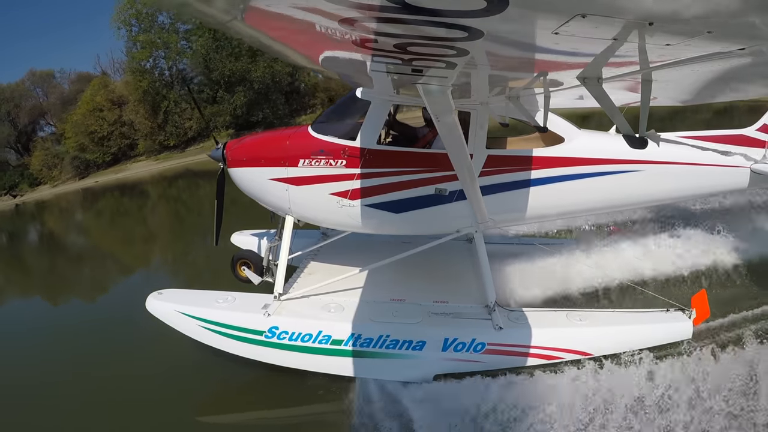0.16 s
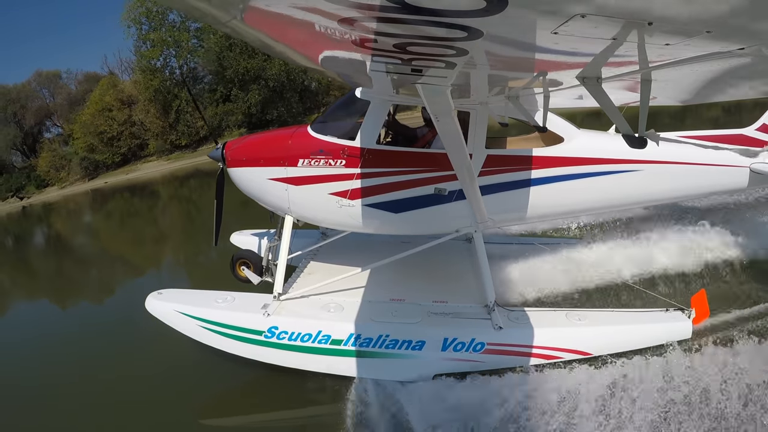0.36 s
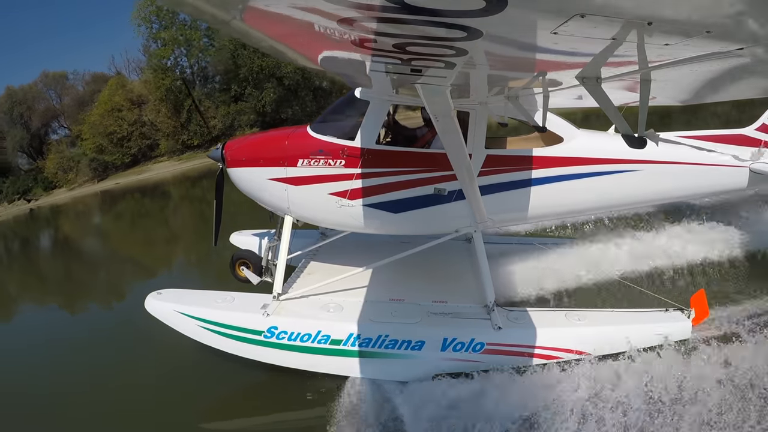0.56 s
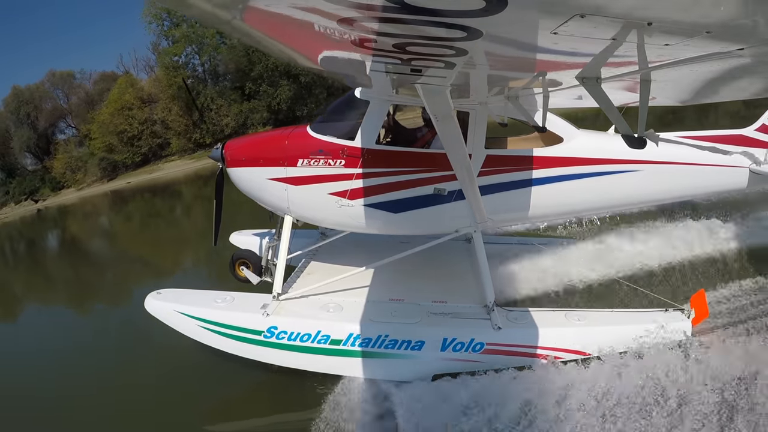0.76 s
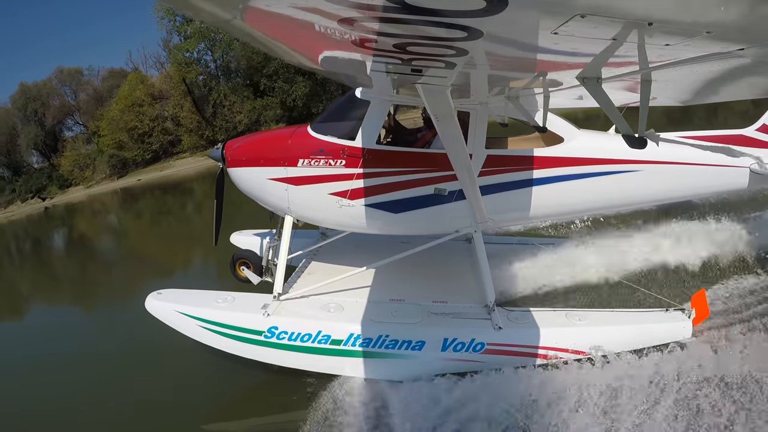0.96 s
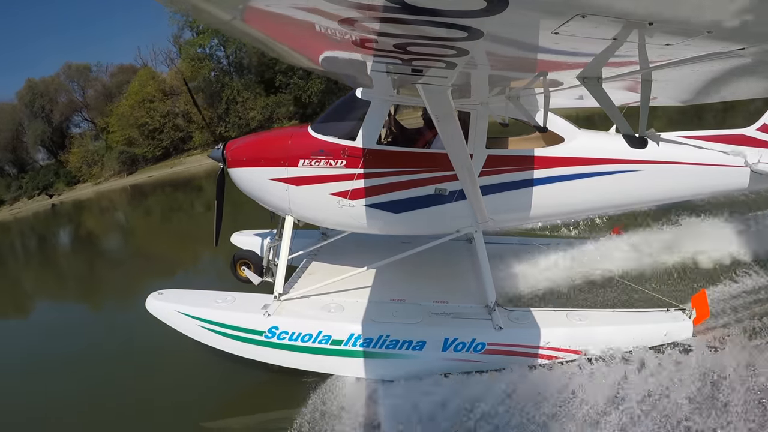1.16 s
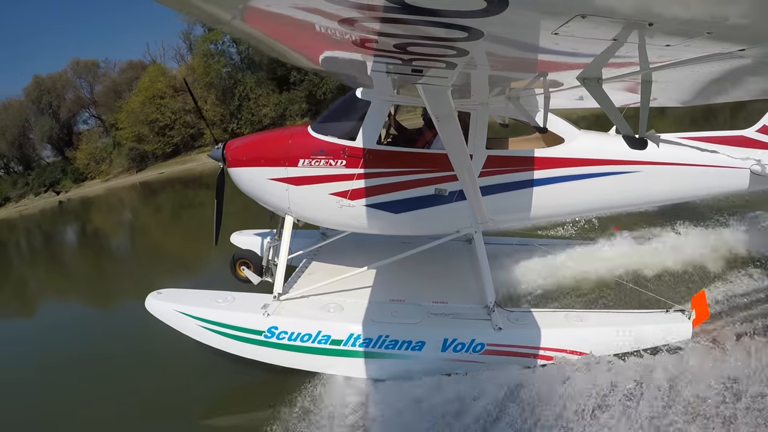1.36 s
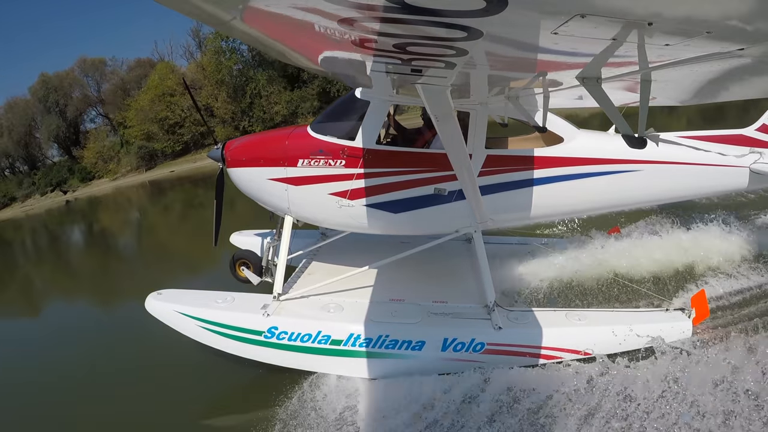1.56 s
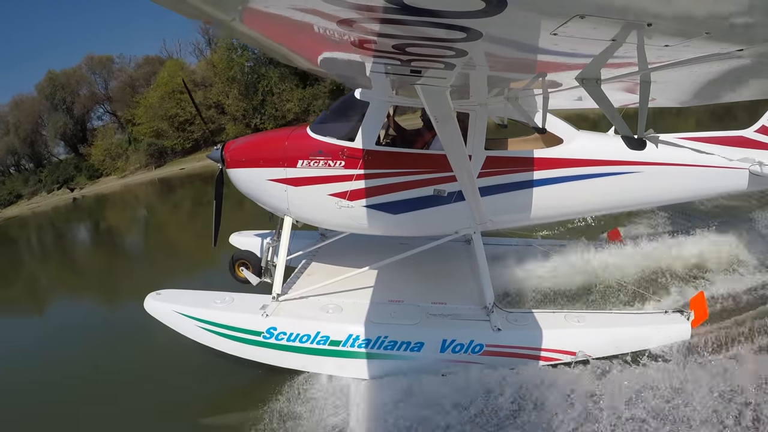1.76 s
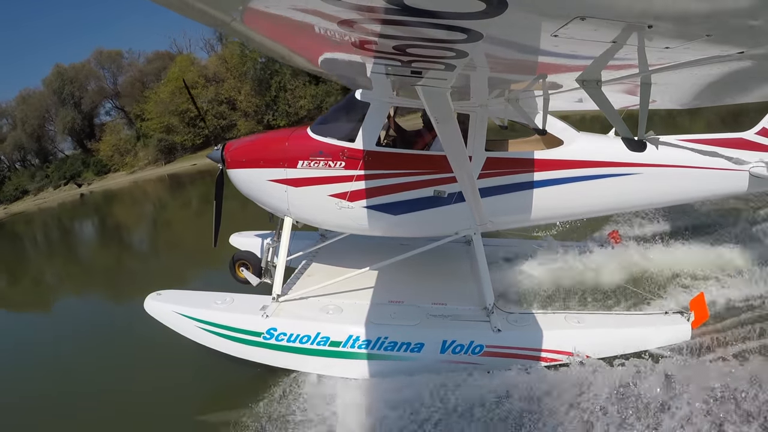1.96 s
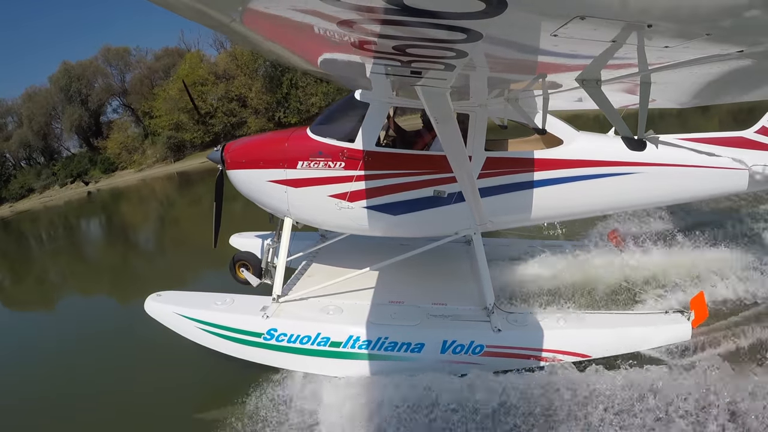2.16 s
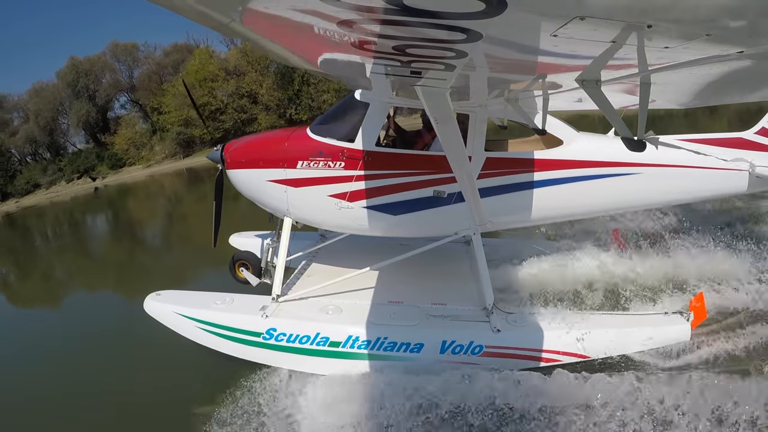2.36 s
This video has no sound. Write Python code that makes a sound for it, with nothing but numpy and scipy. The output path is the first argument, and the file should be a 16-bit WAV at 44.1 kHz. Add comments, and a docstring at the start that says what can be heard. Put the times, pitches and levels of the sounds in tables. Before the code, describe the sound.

Close, bassy wind buffeting dominates on a moving floatplane over a river, thudding in irregular swells; a soft hiss of spray runs throughout, then bubbling water splashes build during the last second.

```python
"""On a river, under the wing of a skimming floatplane: a microphone in a housing fixed in the airstream.
Up close, shaped noise and short wavering tones make the housing boom in uneven swells over a low engine drone.
The floats throw a hissing sheet of spray, random clicks and noise that brighten as it creeps forward.
A churning wash of noise and ringing bubbles builds in surges; a thin high sizzle of mist joins at the end.
"""
import sys
import numpy as np
from scipy import signal
from scipy.fft import rfft, irfft
from scipy.io import wavfile
from scipy.ndimage import uniform_filter1d, minimum_filter1d

SR = 44100
rng = np.random.default_rng(int(sys.argv[2]) if len(sys.argv) > 2 else 0)


def waveform_to_disk(signal):
    """Save audio, clipped to [-1, 1], as 16-bit WAV at the path in sys.argv[1]."""
    frames = np.transpose(np.atleast_2d(signal))
    scaled = np.clip(frames, -1, 1) * 32767
    samples = np.round(scaled).astype(np.int16)
    wavfile.write(sys.argv[1], SR, samples)


N = 111573

# rumble of the airstream on the housing: pitch_hz, relative_level_db
BUFFET_SPECTRUM = [(10, -20), (19, 1.5), (33, -17.5), (48, -3), (64, -2), (95, -0.1), (125, -6),
                   (150, -5.5), (175, -9), (215, -13.5), (260, -18.5), (310, -20.5), (400, -23.5),
                   (700, -31.5), (1200, -45), (3000, -86)]
# resonances of the housing and its mount: pitch_hz, width_hz, level_db before the swing, share of the swing
HOUSING_RESONANCES = [(72, 36, -38, 0.3), (126, 45, -38.5, 0.75), (202.3, 53, -50, 0.67)]
# swing of the boom, added to housing and engine levels: time_s, swing_db
BOOM_SWING = [(0, 8.5), (.15, -11), (.3, 2), (.55, -6.5), (.8, 7), (1.0, -6), (1.25, 1.5), (1.5, -1),
              (1.78, 6), (1.93, -19), (2.04, 3.5), (2.18, 4.5), (2.33, -7.5), (2.53, -5)]
# swells in which the housing booms: middle_s, length_s, pitch_hz, level_db
BOOM_SWELLS = [(0.017, 0.073, 50.8, -31.5), (0.065, 0.049, 115.1, -34.5), (0.17, 0.055, 74.6, -32.5),
               (0.214, 0.036, 116.2, -30), (.29, 0.08, 126, -29), (0.354, 0.059, 137, -30.5),
               (0.423, 0.029, 117.8, -27.5), (0.46, 0.073, 79.5, -33.5), (0.523, 0.024, 120, -27),
               (0.631, 0.045, 122, -32.5), (.67, 0.083, 80, -32), (0.786, 0.091, 117.4, -31),
               (0.935, 0.036, 111.6, -30.5), (1.012, 0.11, 74.8, -30), (1.202, 0.031, 130.5, -27),
               (1.309, 0.046, 120.4, -28), (1.42, 0.066, 134, -33.5), (1.433, 0.03, 76.9, -31),
               (1.607, 0.076, 129, -29.5), (1.68, 0.06, 65.3, -35), (1.785, 0.075, 120, -28.5),
               (1.856, .045, 67.5, -32), (2.008, 0.026, 129.9, -26.5), (2.06, 0.053, 72, -30.5),
               (2.166, 0.045, 129.7, -28), (2.306, .06, 86, -30.5), (2.445, 0.047, 128, -30.5)]
# short gusts that flap against the housing: middle_s, length_s, pitch_hz, level_db
FLAPPING_GUSTS = [(.03, 0.041, 445, -48.5), (.1, 0.026, 304, -48.5), (.265, 0.019, 377, -44.5),
                  (.49, 0.016, 299, -39.5), (.56, 0.013, 370, -49.5), (.71, 0.031, 300, -47),
                  (.92, 0.017, 365, -43), (1.63, 0.038, 270, -46.5)]
# engine drone, half buried in wind: multiple of the shaft rate, level_db before the swing, share of the swing
ENGINE_PARTIALS = [(2, -45, 0.34), (3, -43.5, 1)]
# sheet of spray off the floats: pitch_hz, relative_level_db
SPRAY_SPECTRUM = [(400, -12.5), (900, -9), (1300, -4.5), (1900, 0), (2400, -2.5), (3150, -8), (3500, -6),
                  (3950, 0), (4300, 0), (4600, 0.5), (5100, -1.5), (6400, -2.5), (7300, -6), (8500, -13.5),
                  (10000, -25), (11500, -35), (13000, -43), (15000, -56)]
# nearness of the spray, heard as its level: time_s, level_db
SPRAY_NEARNESS = [(0, -48.5), (.5, -48), (1.0, -47), (1.5, -46), (2.0, -45.5), (2.53, -46)]
# churning wash along the floats: pitch_hz, relative_level_db
WASH_SPECTRUM = [(250, -19), (400, -8), (520, 3), (660, 4.5), (760, -2.5), (900, -0.5), (1150, -3),
                 (1400, -4), (1800, -19), (2400, -20.5), (3100, -16), (3700, -18), (5000, -50)]
# build-up of the wash, before its bass is adjusted: time_s, level_db
WASH_BUILD = [(0, -81), (.7, -71), (1.0, -56), (1.3, -55), (1.65, -49.5), (1.8, -47), (1.9, -48.5),
              (2.15, -46), (2.29, -46.5), (2.4, -48.5), (2.53, -45)]
# surges of water thrown up by the floats: middle_s, length_s, pitch_hz, level_db
WATER_SURGES = [(1.97, .07, 560, -56), (2.13, 0.051, 664, -50.5), (2.22, 0.067, 850, -53),
                (2.38, 0.11, 584, -46.5), (2.48, 0.11, 548, -46)]
# high sizzle of fine mist: pitch_hz, relative_level_db
MIST_SPECTRUM = [(10500, -42), (11500, -12), (12300, 5.5), (13800, 7), (15100, 4), (16000, -8)]
# arrival of the mist, before panning: time_s, level_db
MIST_ARRIVAL = [(0, -115), (1.7, -99), (2.0, -82), (2.25, -73.5), (2.4, -63), (2.53, -60)]

# wavering settings give a spread (standard deviation) and a rate in Hz
BUFFET_DB, BUFFET_WAVER_DB, BUFFET_WAVER_HZ = -33, 0.1, 20
SWELL_WANDER, SWELL_WANDER_HZ = 0.0624, 30.3   # spread as a fraction of the pitch
SWELL_FLUTTER_DB, SWELL_FLUTTER_HZ = 2.5, 46
GUST_WIDTH_OCTAVES, SURGE_WIDTH_OCTAVES = 0.82, 0.74
SHAFT_HZ, SHAFT_WANDER, SHAFT_WANDER_HZ = 39.47, 0.02095, 3.22   # spread as a fraction of the rate
DRONE_WAVER_DB, DRONE_WAVER_HZ = 3.5, 1.6
DROPS_PER_S, DROP_SPREAD_DB, DROP_POWER_SHARE = 12000, 1, 0.22
SPRAY_FLICKER_DB, SPRAY_FLICKER_HZ = 0.35, 42
NEAR_DB, BRIGHTEN, BRIGHTEN_HZ = -46.5, 4.2, 6140   # extra treble dB per dB of nearness, above this pitch
BUBBLES_PER_S, BUBBLE_SPREAD_DB = 2400, 7.0
BUBBLE_CYCLES, BUBBLE_DB = 9.6, -5.5   # cycles to die by 60 dB; level against the churn
WASH_FLICKER_DB, WASH_FLICKER_HZ = 0.9, 20
WASH_FULL_DB, WASH_DEEPEN, WASH_DEEPEN_HZ = -39.5, 1, 790   # bass dB per dB of wash, below this pitch
MIST_SIDE_DB, MIST_PAN_DB = -2, 1.5   # side against middle; right raised and left lowered by the pan
LIMIT_HZ, LIMIT_DB, LIMIT_RELEASE_DB_PER_S, LIMIT_ATTACK_S = 505, -23, 103, 0.0046
EASE_IN_S, CUTOFF_HZ = 0.004, 15300


def wind():
    """Gusty turbulence rumbles on the housing and keeps its low resonances booming."""
    rumble = colour(rng.standard_normal(N), BUFFET_SPECTRUM)
    out = from_db(BUFFET_DB + BUFFET_WAVER_DB * drift(BUFFET_WAVER_HZ)) * rumble
    swing_db = in_time(BOOM_SWING)
    for hz, width, db, share in HOUSING_RESONANCES:
        # a second of run-up is dropped, so the resonance is already sounding
        boom = rms_one(band_pass(rng.standard_normal(N + SR), hz - width / 2, hz + width / 2)[SR:])
        out = out + from_db(db + share * swing_db) * boom
    return out


def swells():
    """Passing eddies make the housing boom for a few cycles, fluttering and unsteady in pitch."""
    clock_s = np.cumsum(1 + SWELL_WANDER * drift(SWELL_WANDER_HZ)) / SR
    out = 0
    for middle_s, length_s, hz, db in BOOM_SWELLS:
        flutter = from_db(SWELL_FLUTTER_DB * drift(SWELL_FLUTTER_HZ))
        tone = np.sin(2 * np.pi * (hz * clock_s + rng.random()))
        out = out + from_db(db) * bump(middle_s, length_s) * rms_one(flutter * tone)
    return out


def gusts():
    """Short bands of turbulence flap against the housing."""
    return rushes(FLAPPING_GUSTS, GUST_WIDTH_OCTAVES)


def engine():
    """Two low partials wander in pitch together, waver in the airstream and swell with the housing's boom."""
    turns = np.cumsum(SHAFT_HZ * (1 + SHAFT_WANDER * drift(SHAFT_WANDER_HZ))) / SR
    swing_db = in_time(BOOM_SWING)
    out = 0
    for multiple, db, share in ENGINE_PARTIALS:
        partial = rms_one(np.sin(2 * np.pi * (round(multiple) * turns + rng.random())))
        waver_db = DRONE_WAVER_DB * drift(DRONE_WAVER_HZ)
        out = out + from_db(db + share * swing_db + waver_db) * partial
    return out


def spray():
    """Countless droplets merge into a hiss, brighter as it nears."""
    level_db = in_time(SPRAY_NEARNESS)
    drops = np.sqrt(DROP_POWER_SHARE) * rms_one(impacts(DROPS_PER_S, DROP_SPREAD_DB))
    merged = np.sqrt(1 - DROP_POWER_SHARE) * rng.standard_normal(N)
    hiss = flicker(colour(drops + merged, SPRAY_SPECTRUM), SPRAY_FLICKER_DB, SPRAY_FLICKER_HZ)
    low, high = split(hiss, BRIGHTEN_HZ)
    return from_db(level_db) * (low + high * from_db(BRIGHTEN * (level_db - NEAR_DB)))


def wash():
    """Churned water and ringing bubbles, deeper as the wash swells."""
    level_db = in_time(WASH_BUILD)
    pitches_hz = np.geomspace(400, 1700, 20)
    births = impacts(BUBBLES_PER_S, BUBBLE_SPREAD_DB)
    dealt = rng.integers(0, len(pitches_hz), N)   # which pitch each bubble takes
    bubbles = 0
    for k, hz in enumerate(pitches_hz):
        bubbles = bubbles + ring(births * (dealt == k), hz, BUBBLE_CYCLES / hz)
    churn = flicker(colour(rng.standard_normal(N), WASH_SPECTRUM), WASH_FLICKER_DB, WASH_FLICKER_HZ)
    low, high = split(churn + from_db(BUBBLE_DB) * rms_one(bubbles), WASH_DEEPEN_HZ)
    return from_db(level_db) * (high + low * from_db(WASH_DEEPEN * (level_db - WASH_FULL_DB)))


def surges():
    """Short bands of noise stand for water thrown up by the floats."""
    return rushes(WATER_SURGES, SURGE_WIDTH_OCTAVES)


def mist():
    """A thin, wide sizzle above the spray, leaning to the right."""
    middle = colour(rng.standard_normal(N), MIST_SPECTRUM)
    side = colour(rng.standard_normal(N), MIST_SPECTRUM)
    sides = np.array([[-1], [1]])   # left, right
    level = from_db(in_time(MIST_ARRIVAL) + MIST_PAN_DB * sides)
    return level * (middle + from_db(MIST_SIDE_DB) * sides * side)


def rushes(rows, octaves):
    """Short rushes of turbulence, each a band of noise around its own pitch."""
    out = 0
    for middle_s, length_s, hz, db in rows:
        noise = band_pass(rng.standard_normal(N), hz * 2 ** (-octaves / 2), hz * 2 ** (octaves / 2))
        out = out + from_db(db) * bump(middle_s, length_s) * rms_one(noise)
    return out


def bump(middle_s, length_s):
    """A smooth rise and fall; its length is taken at half power."""
    return 2 ** (-2 * ((np.arange(N) / SR - middle_s) / length_s) ** 2)


def impacts(per_s, spread_db):
    """Random clicks of either sign, many small and a few large."""
    sizes = from_db(spread_db * np.minimum(rng.exponential(1, N), 5)) * rng.choice([-1, 1], N)
    return sizes * (rng.random(N) < per_s / SR)


def ring(clicks, hz, t60_s):
    """Each click sets a sine ringing that dies by 60 dB in t60_s."""
    decay = from_db(-60 / (t60_s * SR))
    turn = 2 * np.pi * hz / SR
    # the tiny offset keeps the filter from stalling on near-zero numbers
    return signal.lfilter([0, np.sin(turn)], [1, -2 * decay * np.cos(turn), decay ** 2], clicks + 1e-18)


def flicker(x, depth_db, rate_hz):
    """Each octave wavers, partly on its own and partly with the rest."""
    out, together = 0, drift(rate_hz / 2)
    for hz in 400 * 2 ** np.arange(7):
        band, x = split(x, hz)
        out = out + band * from_db(depth_db * (drift(rate_hz) + 0.5 * together))
    return out


def drift(rate_hz):
    """Smooth random wandering with spread 1."""
    bins_hz = np.fft.rfftfreq(N, 1 / SR)
    return rms_one(irfft(rfft(rng.standard_normal(N)) / (1 + (bins_hz / rate_hz) ** 2), N))


def colour(x, spectrum):
    """Give a steady sound a spectrum, joined over log pitch; unit power."""
    hz, db = np.transpose(spectrum)
    bins_hz = np.maximum(np.fft.rfftfreq(N, 1 / SR), 1)
    gain_db = np.interp(np.log(bins_hz), np.log(hz), db)
    return rms_one(irfft(rfft(x) * from_db(gain_db), N))


def split(x, hz):
    """The parts below and above a pitch; they add up to the whole."""
    bins_hz = np.fft.rfftfreq(N, 1 / SR)
    low = irfft(rfft(x) / (1 + (bins_hz / hz) ** 6), N)
    return low, x - low


def band_pass(x, low_hz, high_hz):
    """Keep the band between two pitches, as a resonance does."""
    return signal.sosfilt(signal.butter(2, [low_hz, high_hz], "band", fs=SR, output="sos"), x)


def in_time(rows):
    """Join (time_s, value) rows by straight lines."""
    return np.interp(np.arange(N) / SR, *np.transpose(rows))


def rms_one(x):
    """Scale to unit power."""
    return x / np.sqrt(np.mean(x ** 2) + 1e-20)


def from_db(db):
    """Decibels to gain."""
    return 10 ** (np.asarray(db) / 20)


def scene():
    """Wind, engine and water sit in the centre; only the mist has width."""
    air = wind() + swells() + gusts()
    water = spray() + wash() + surges() + mist()
    return air + water + engine()


def record(dry):
    """A fast limiter holds down the bass peaks; the start is eased in and the top is cut."""
    time_s = np.arange(N) / SR
    bass, _ = split(dry.mean(axis=0), LIMIT_HZ)
    over_db = np.maximum(20 * np.log10(np.abs(bass) + 1e-9) - LIMIT_DB, 0)
    # each peak's reduction is held, then lets go at a steady rate
    fall_db = LIMIT_RELEASE_DB_PER_S * time_s
    released_db = fall_db - np.maximum.accumulate(over_db + fall_db)
    # spread and smoothed over the attack time, so the gain moves before the peak
    size = max(int(LIMIT_ATTACK_S * SR), 1)
    gain_db = uniform_filter1d(minimum_filter1d(released_db, size), size)
    limited = dry + bass * (from_db(gain_db) - 1)
    eased = limited * np.minimum(time_s / EASE_IN_S, 1)
    return signal.sosfilt(signal.ellip(12, 0.1, 90, CUTOFF_HZ, fs=SR, output="sos"), eased)


dry = scene()
out = record(dry)
waveform_to_disk(out)
```